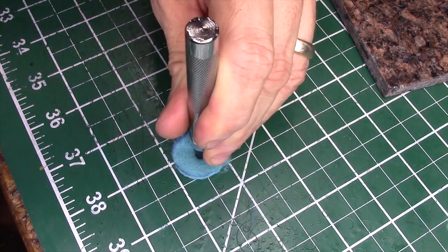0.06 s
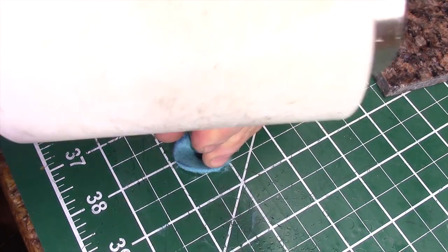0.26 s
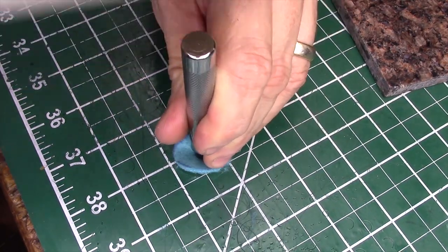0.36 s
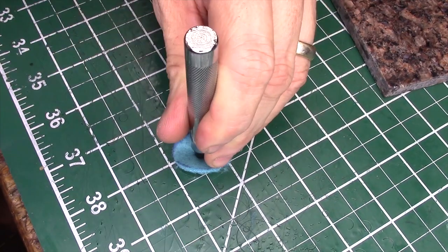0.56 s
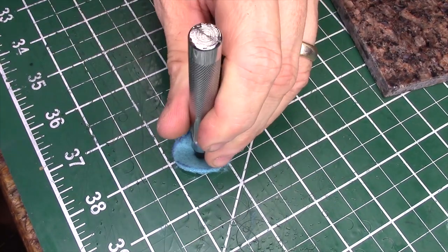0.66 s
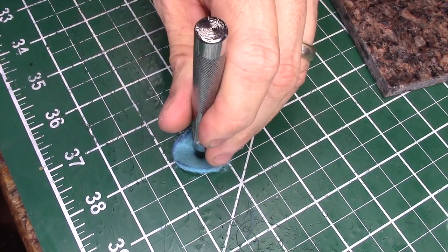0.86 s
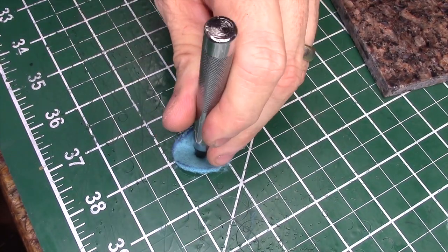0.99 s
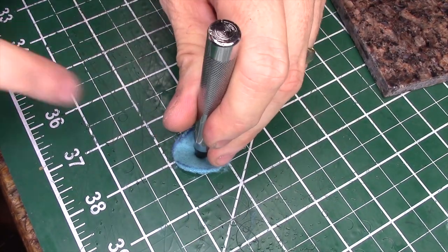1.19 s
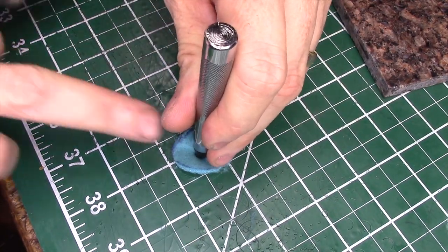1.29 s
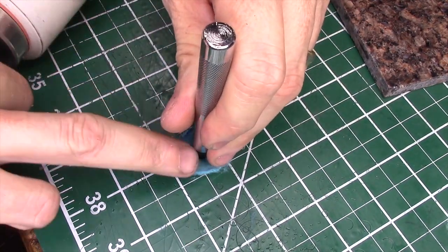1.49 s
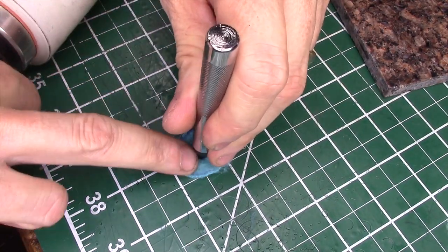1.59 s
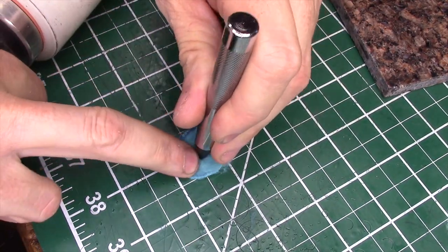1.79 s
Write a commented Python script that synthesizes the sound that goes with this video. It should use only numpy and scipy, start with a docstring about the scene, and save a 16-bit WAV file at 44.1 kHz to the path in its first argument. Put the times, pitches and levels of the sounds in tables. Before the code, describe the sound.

A mallet strikes a steel hole punch once at about 0.2 seconds, a loud, close, slightly distorted crack with a bench thud and a thin, high metallic chatter that dies by 0.5 seconds. At 1.4 seconds the mallet is set down with a softer thud and rocks with two tiny knocks. A fingertip faintly pats the felt near 1.8 seconds, over barely audible hand rustle in a quiet workshop.

```python
"""Hole punch and mallet

A mallet drives a steel punch through felt into a cutting mat on a workbench, close up.
The blow overloads the recorder, whose gain control briefly holds the room's ring level.
The punch sings and chatters; the mallet is set down with a thud and rocks to rest.
Hands shift on the felt in the quiet workshop."""
import sys
import numpy as np
from scipy import signal
from scipy.fft import rfft, irfft
from scipy.io import wavfile

SR = 44100
rng = np.random.default_rng(int(sys.argv[2]) if len(sys.argv) > 2 else 0)


def waveform_to_disk(signal):
    """Save audio, clipped to [-1, 1], as 16-bit WAV at the path in sys.argv[1]."""
    frames = np.transpose(np.atleast_2d(signal))
    scaled = np.clip(frames, -1, 1) * 32767
    samples = np.round(scaled).astype(np.int16)
    wavfile.write(sys.argv[1], SR, samples)


N = 81585
TIME_S = np.arange(N) / SR
BIN_HZ = np.maximum(np.arange(N // 2 + 1) * SR / N, 1)

# noise spectra: f/Hz, relative density/dB
ROOM_TONE_SPECTRUM = [(15, -65.5), (25, -26.5), (161, -1), (301, -0.5), (354, -4), (384, -2), (714, -14),
                      (1330, -18), (1940, -18.5), (2910, -22), (4370, -24), (12200, -35.5), (16000, -43.5)]
RUSTLE_SPECTRUM = [(30, -29.5), (90, -3.5), (160, 5.5), (300, -2), (600, -6), (1200, -19), (4000, -26.5),
                   (10000, -39), (16000, -49)]
BRUSH_SPECTRUM = [(300, 2.5), (2000, 0), (7000, -8), (11000, -10), (16000, -14)]
CRACK_SPECTRUM = [(60, -19), (250, -6.5), (550, 2), (1200, 2.5), (2200, -6), (2900, -11.5), (3800, -3),
                  (5000, -16.5), (6700, -18), (10000, -30), (16000, -35.5)]
BLOW_TAIL_SPECTRUM = [(30, -30.5), (65, -18), (120, -10.5), (200, 0), (350, -0.5), (600, 4), (950, -5.5),
                      (1600, -9), (3200, -13.5), (4300, -23.5), (7000, -30.5), (12500, -44), (15000, -50.5)]
CHATTER_SPECTRUM = [(1000, -20.5), (6000, -16), (9000, -3), (12800, 3), (13800, -11.5), (15000, -50.5)]
CLACK_SPECTRUM = [(150, -21), (500, -4.5), (750, -3.5), (1000, 5), (1400, -9.5), (3000, -20), (7000, -33),
                  (16000, -58)]
CLICK_SPECTRUM = [(100, -7.5), (900, 11.5), (1500, -6), (2300, 5), (3500, -4), (5500, -4.5), (8000, -14.5),
                  (12000, -58), (16000, -42)]
KNOCK_TAIL_SPECTRUM = [(40, -20), (130, 8), (340, 6.5), (600, -4.5), (1000, -17), (2500, -25.5),
                       (6000, -40.5), (12000, -67), (16000, -50)]
PAT_SPECTRUM = [(60, -4), (150, -1), (350, 5), (600, -6.5), (1000, -21), (2000, -27.5), (6000, -45)]
PAT_EDGE_SPECTRUM = [(1000, -20), (2200, -7), (3100, 4), (4600, -2), (6500, -4.5), (12000, -10),
                     (15500, -31)]
# stereo width: f/Hz, side re mid/dB
STEREO_WIDTH = [(60, -24.5), (150, -31.5), (500, -26.5), (1000, -20.5), (8000, -21)]
# arm and hand rustle: t/s, level/dB
RUSTLE_LEVELS = [(0, -60.5), (0.13, -59.5), (0.2, -57.5), (0.55, -75), (1.05, -79), (1.25, -65.5),
                 (1.36, -62), (1.62, -70.5), (1.72, -67.5), (1.85, -65)]
# finger strokes: t/s, length/s, level/dB
FINGER_STROKES = [(0.849, .06, -73.5), (1.277, 0.12, -75.5), (1.346, 0.014, -68), (1.408, 0.0045, -55),
                  (1.419, 0.014, -63.5), (1.816, 0.08, -68)]
# bench modes: f/Hz, level via punch/dB, level via side knock/dB, t60/s
BENCH_MODES = [(68, -14, -27, .2), (135, -15.5, -15.5, 0.21), (219.8, 0, -21.5, .08),
               (305.4, -7, -3.5, 0.037), (356, -9, 1.5, .032), (559, 3.5, -23, 0.03), (660, 0, -15, .03),
               (802, -4.5, -22, .035), (985, -6, -25, 0.049), (2210, -4, -31, 0.017)]
# room decay: f/Hz, t60/s
ROOM_DECAY = [(60, 0.19), (190, .34), (350, .29), (600, 0.26), (1500, 0.29), (3500, 0.33), (8000, .29),
              (14000, .25)]
# long bench and room modes: f/Hz, relative level/dB
LONG_MODES = [(120, -15.5), (193, 0), (242, -2.5), (284, 1), (378, -6), (453, -6), (499, 4), (538, -4.5),
              (627, -8), (663, -5), (813, -8), (874, -5.5), (925, -6.5), (970, -7.5), (1264, -15),
              (1402, -12.5), (2989, -14.5)]
# punch chatter on mallet rebound: t/s, relative ring/dB, relative tick/dB
REBOUNDS = [(0.2440, -14, -6), (0.2737, -9, -23), (0.2778, -7, 5.5), (0.281, -23, -2.5), (0.3006, -34, 5.5),
            (0.316, -39.5, -17)]
# mallet on bench: t/s, thud/dB, thud tilt/(dB/oct), click/dB, click tilt/(dB/oct), room/dB
MALLET_KNOCKS = [(1.3883, -12, 3, -28, -.5, -34), (1.5315, -32, -3, -41.5, -3.5, -48),
                 (1.5729, -47.5, 0.5, -48.5, -4, -54)]

BLOW_S = 0.2026


def from_db(db):
    """Decibels to gain."""
    return 10 ** (np.asarray(db) / 20)


def at_hz(table, hz):
    """Table lookup, log-frequency axis."""
    table_hz, values = np.transpose(table)
    return np.interp(np.log(hz), np.log(table_hz), values)


def decay(start_s, t60_s):
    """Step to 1, then exponential decay."""
    age_s = TIME_S - start_s
    return np.clip(age_s * SR, 0, 1) * from_db(-60 * np.clip(age_s / t60_s, 0, 4))


def rise(start_s, tau_s):
    """Exponential onset, 0 to 1."""
    return 1 - np.exp(-np.maximum(TIME_S - start_s, 0) / tau_s)


def bump(centre_s, length_s):
    """Gaussian envelope."""
    return np.exp(-(2 * (TIME_S - centre_s) / length_s) ** 2)


def ring(start_s, hz, t60_s):
    """One struck mode."""
    return decay(start_s, t60_s) * np.sin(2 * np.pi * hz * (TIME_S - start_s))


def low_cut(x, hz):
    """Second-order high-pass."""
    return signal.sosfilt(signal.butter(2, hz, "high", fs=SR, output="sos"), x + 1e-18)


def noise(spectrum, tilt_db_oct=0):
    """Shaped near-mono noise, rms 1; tilt acts above 1 kHz."""
    mid, side = rfft(rng.standard_normal((2, N)))
    octaves_up = np.log2(np.maximum(BIN_HZ, 1000) / 1000)
    gain = from_db(at_hz(spectrum, BIN_HZ) + tilt_db_oct * octaves_up) * (BIN_HZ > 20)
    stereo = mid + side * from_db(at_hz(STEREO_WIDTH, BIN_HZ)) * [[1], [-1]]
    x = irfft(gain * stereo, N)
    return x / np.std(x)


def room_tone():
    """Steady, dull workshop background."""
    return from_db(-69) * noise(ROOM_TONE_SPECTRUM)


def hands():
    """Arm and hands rustle; fingers brush felt and knurled steel."""
    rustle = from_db(np.interp(TIME_S, *np.transpose(RUSTLE_LEVELS))) * noise(RUSTLE_SPECTRUM)
    strokes = sum(from_db(db) * bump(centre_s, length_s) for centre_s, length_s, db in FINGER_STROKES)
    return rustle + strokes * noise(BRUSH_SPECTRUM)


def blow():
    """Mallet hits punch: crack, bench thud, long modes dying with the room, diffuse tail."""
    crack = from_db(7) * noise(CRACK_SPECTRUM) * decay(BLOW_S, t60_s=0.027)
    thud = from_db(6) * bench_thud(BLOW_S, [db for _, db, _, _ in BENCH_MODES])
    modes = sum(from_db(db) * (-1) ** k * ring(BLOW_S, hz, at_hz(ROOM_DECAY, hz))
                for k, (hz, db) in enumerate(LONG_MODES))
    tail = from_db(-3) * room_tail(BLOW_S, BLOW_TAIL_SPECTRUM)
    return crack + thud + from_db(-9) * modes + tail


def bench_thud(contact_s, levels_db, lag_s=0.0012):
    """Damped bench modes swell and die; the contact point sets their levels."""
    start_s = contact_s + lag_s
    modes = sum(from_db(db) * ring(start_s, hz, t60_s)
                for db, (hz, _, _, t60_s) in zip(levels_db, BENCH_MODES))
    return -low_cut(rise(start_s, tau_s=0.001) * modes, hz=100)


def room_tail(start_s, spectrum):
    """Diffuse sound after a hit; each octave dies at the room's rate."""
    bins = rfft(noise(spectrum))
    centres_hz = np.geomspace(60, 15360, 9)
    tail = 0
    for hz, selector in zip(centres_hz, np.eye(len(centres_hz))):
        band_gain = np.interp(np.log2(BIN_HZ), np.log2(centres_hz), selector)
        tail += irfft(bins * band_gain, N) * decay(start_s, at_hz(ROOM_DECAY, hz))
    return tail


def punch_ring(mode_hz=13000, beat_hz=38, blur_width_hz=120, rebound_db=-20):
    """Lengthwise steel mode: a finger-damped beating pair that lingers, blurred, in the room."""
    touches = [(BLOW_S, -24)] + [(start_s, rebound_db + db) for start_s, db, _ in REBOUNDS]

    def envelope(t60_s):
        """Touches add in power."""
        return np.sqrt(sum((from_db(db) * decay(start_s, t60_s)) ** 2 for start_s, db in touches))

    mode = np.sin(2 * np.pi * mode_hz * TIME_S)
    twin = from_db(-8.5) * np.sin(2 * np.pi * (mode_hz + beat_hz) * TIME_S)
    resonator = signal.iirpeak(mode_hz, mode_hz / blur_width_hz, fs=SR)
    blur = signal.lfilter(*resonator, noise(CHATTER_SPECTRUM))
    blur *= from_db(-12.5) / np.std(blur)
    return envelope(t60_s=0.16) * (mode + twin) + envelope(t60_s=0.235) * blur


def clack(start_s=0.2335):
    """Mallet meets punch again: short, hollow, soft onset."""
    envelope = rise(start_s, tau_s=0.002) * decay(start_s, t60_s=0.03)
    return from_db(-3) * noise(CLACK_SPECTRUM) * envelope


def chatter(gain_db=-27.5, top_hz=13300):
    """Punch ticks as the mallet rebounds."""
    envelope = sum(from_db(gain_db + db) * decay(start_s, t60_s=0.004) for start_s, _, db in REBOUNDS)
    low_pass = signal.butter(10, top_hz, fs=SR, output="sos")
    return signal.sosfilt(low_pass, envelope * noise(CHATTER_SPECTRUM))


def squeak(hz=1115):
    """Faint pitched blip after the blow."""
    return from_db(-61) * bump(centre_s=0.6, length_s=0.0092) * np.sin(2 * np.pi * hz * TIME_S)


def mallet_set_down(tilt_pivot_hz=328.4):
    """Mallet lands and rocks to rest; each knock gives a click, a bench thud and a room tail."""
    knocks = 0
    for start_s, thud_db, thud_db_oct, click_db, click_db_oct, room_db in MALLET_KNOCKS:
        envelope = decay(start_s, t60_s=0.011) + from_db(-15.5) * decay(start_s, t60_s=0.13)
        click = from_db(click_db) * noise(CLICK_SPECTRUM, click_db_oct) * envelope
        levels_db = [db + thud_db_oct * np.log2(hz / tilt_pivot_hz) for hz, _, db, _ in BENCH_MODES]
        thud = from_db(thud_db) * bench_thud(start_s, levels_db)
        tail = from_db(room_db) * room_tail(start_s, KNOCK_TAIL_SPECTRUM)
        knocks += click + thud + tail
    return knocks


def fingertip(start_s=1.7868):
    """Finger lands on felt: soft pat, crisp edge."""
    pat = from_db(-40) * noise(PAT_SPECTRUM) * decay(start_s, t60_s=0.077)
    edge = from_db(-48) * noise(PAT_EDGE_SPECTRUM) * decay(start_s, t60_s=0.026)
    return pat + edge


def scene():
    """Bench sounds, high-passed, over room tone."""
    strike = blow() + punch_ring() + chatter() + clack()
    close = strike + squeak() + mallet_set_down() + hands() + fingertip()
    return low_cut(close, hz=85) + room_tone()


def record(dry, threshold_db=-12, duck_db_per_db=0.78, attack_s=0.0016, release_db_per_s=229):
    """Gain control ducks late, so the first peaks clip; low-pass, stopband from 16.6 kHz."""
    peak_db = 20 * np.log10(np.abs(dry).max(axis=0) + 1e-9)
    over_db = np.maximum(peak_db - threshold_db, 0)
    release_db = release_db_per_s * TIME_S
    held_db = np.maximum.accumulate(over_db + release_db) - release_db
    pole = np.exp(-1 / (attack_s * SR))
    duck_db = duck_db_per_db * signal.lfilter([1 - pole], [1, -pole], held_db)
    clipped = np.clip(dry * from_db(-duck_db), -0.33, 0.33)
    return signal.sosfilt(signal.cheby2(14, 60, 16600, fs=SR, output="sos"), clipped)


dry = scene()
out = record(dry)
waveform_to_disk(out)
```